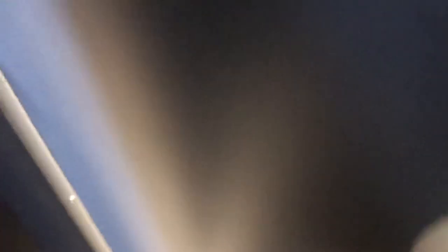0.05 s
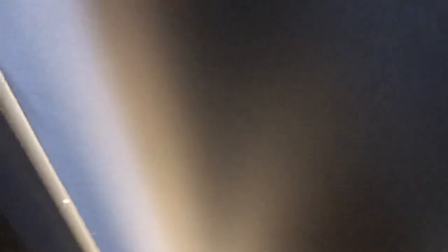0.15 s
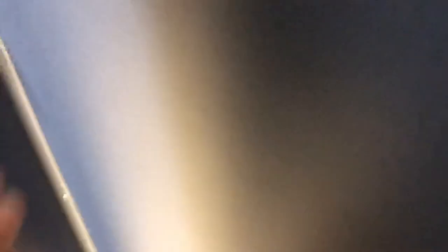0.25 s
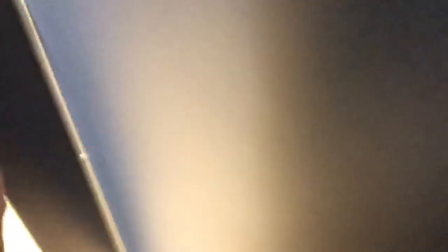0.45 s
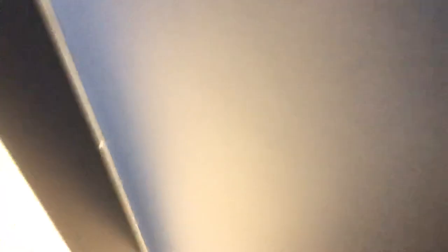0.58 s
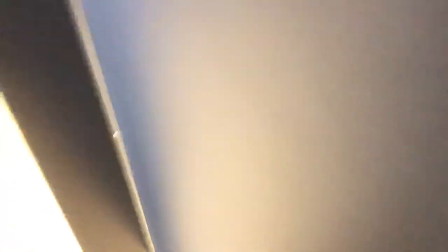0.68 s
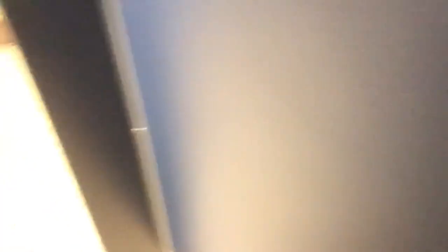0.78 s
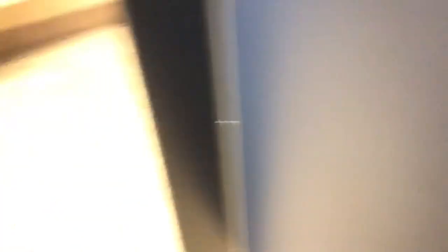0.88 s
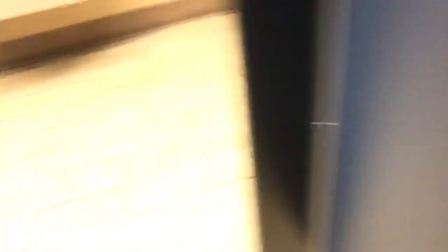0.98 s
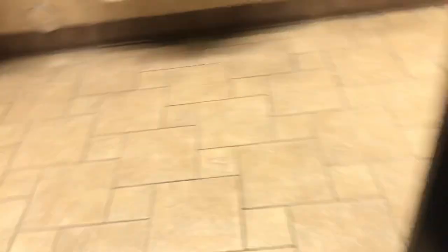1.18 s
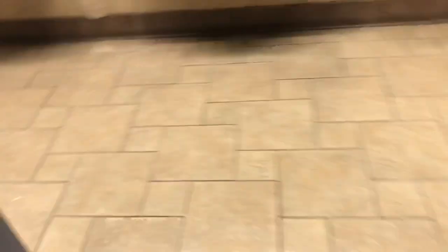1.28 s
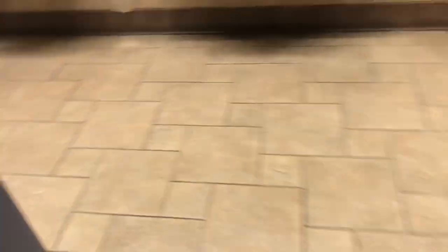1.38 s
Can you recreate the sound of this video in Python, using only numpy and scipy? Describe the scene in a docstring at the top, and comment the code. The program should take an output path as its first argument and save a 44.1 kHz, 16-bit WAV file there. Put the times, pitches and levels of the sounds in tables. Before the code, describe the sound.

Sharp metal latch clacks, then a stall door knocking loose over a faint ventilation hum.

```python
"""A small tiled toilet room, the microphone close to the steel latch of a stall.
The latch is thrown back: three bright clacks in quick succession as the bolt rattles in its keeper.
The bolt then meets its stop, the hollow door knocks loose and swings open with a soft swish.
The tiles ring after every blow, over the rumble and hum of the ventilation."""
import sys
import numpy as np
from scipy import signal
from scipy.fft import irfft
from scipy.io import wavfile

SR = 44100
rng = np.random.default_rng(int(sys.argv[2]) if len(sys.argv) > 2 else 0)


def int16_out(signal):
    """Quantize to a 16-bit WAV file."""
    q = np.round(np.clip(np.atleast_2d(signal).T, -1, 1) * 32767)
    wavfile.write(sys.argv[1], SR, q.astype(np.int16))


N = 63945


def undb(db):
    """Decibels to gain."""
    return 10 ** (np.asarray(db) / 20)


def times():
    """Time of every sample."""
    return np.arange(N) / SR


def bins():
    """Frequency of every spectral bin."""
    return np.arange(N // 2 + 1) * SR / N


def unit(x):
    """Scale to rms 1."""
    return x / np.sqrt(np.mean(x ** 2))


def fade(t60):
    """Exponential decay, 60 dB down after t60 seconds."""
    return np.exp(-np.log(1000) * times() / max(t60, 1 / SR))


def lookup(points, hz):
    """Read a table on a log-frequency axis."""
    freqs, values = np.array(points, float).T
    return np.interp(np.log(np.maximum(hz, 1)), np.log(freqs), values)


def noise(gain):
    """Noise of rms 1 with the given relative gain per bin."""
    phases = np.exp(2j * np.pi * rng.random(N // 2 + 1))
    return unit(irfft(gain * phases, N))


def coloured(points):
    """Noise of rms 1 shaped by (frequency [Hz], relative level [dB]) points."""
    return noise(undb(lookup(points, bins())))


def band(hz, octaves):
    """Noise of rms 1 in a bell-shaped band on a log-frequency axis."""
    distance = np.log2(np.maximum(bins(), 1) / hz)
    return noise(np.exp(-.5 * (distance / octaves) ** 2))


def ring(modes):
    """Freely decaying modes after one blow; neighbours swing in opposite directions."""
    t = times()
    return sum((-1) ** k * undb(db) * fade(t60) * np.sin(2 * np.pi * hz * t)
               for k, (hz, db, t60) in enumerate(modes))


def strike(sound, at, rise_s=0.00028):
    """Start a sound at the moment of contact; it swells over the rise time."""
    onset = 1 - np.exp(-times() / rise_s)
    return np.concatenate([np.zeros(max(int(at * SR), 0)), sound * onset])[:N]


def ventilation():
    """Room tone: duct rumble and a wavering motor hum."""
    # moving air (frequency [Hz], relative level [dB])
    air_spectrum = [(20, -25.5), (40, -15), (60, 2.5), (90, -3.5), (140, 0), (230, -3.5), (330, -11.5),
                    (600, -17.5), (1200, -26), (2500, -28.5), (5500, -34.5), (8000, -41.5), (16000, -47)]
    # the air is a little quieter outside the stall (time [s], level [dB])
    air_level = [(0, -45), (1.0, -45.5), (1.2, -48.5), (1.45, -47.5)]
    # motor tones (frequency [Hz], level [dB])
    motor_tones = [(59.3, -60), (119.8, -48), (239.6, -56)]
    t, waver_db = times(), 3.5
    hum = np.zeros(N)
    for hz, db in motor_tones:
        rms = undb(db + waver_db * band(1.3, octaves=0.94))
        hum += rms * np.sqrt(2) * np.sin(2 * np.pi * (hz * t + rng.random()))
    air_gain = undb(np.interp(t, *np.array(air_level).T))
    return air_gain * coloured(air_spectrum) + hum


def room(x):
    """Dense echoes off the tiles; each octave dies at its own rate."""
    # colour of the echoes (frequency [Hz], gain [dB])
    colour = [(100, -7), (300, 4.5), (800, -9), (2000, -14.5), (5000, -15), (9000, -16), (16000, -19)]
    # their decay (frequency [Hz], t60 [s])
    decay_times = [(150, 0.48), (700, 0.41), (2500, 0.62), (6000, 0.33), (10000, 0.12), (16000, 0.2)]
    first_echo_s, build_s = 0.0055, .007
    build = 1 - np.exp(-np.maximum(times() - first_echo_s, 0) / build_s)
    centres = 125 * 2. ** np.arange(8)
    response = np.zeros(N)
    for hz, pick in zip(centres, np.eye(len(centres))):
        share = lookup(list(zip(centres, pick)), bins())  # this octave's part of each bin's power
        echoes = noise(np.sqrt(share) * undb(lookup(colour, bins())))
        tail = echoes * build * fade(lookup(decay_times, hz))
        response += unit(tail) * np.sqrt(share.mean() / N) * undb(lookup(colour, hz))
    return signal.fftconvolve(x, response)[:N]


def swing():
    """Soft rubbing as the door is handled and opened, and a few tiny hinge ticks."""
    # rubs (start [s], rise [s], hold [s], fall [s], level [dB], centre [Hz], width [octaves])
    swishes = [(0.091, 0.0087, 0.0088, 0.04, -47, 433, 0.91), (0.457, 0.053, 0.027, 0.071, -50, 8900, 1),
               (0.585, 0.051, 0.26, 0.16, -62, 4630, 0.33), (.82, .2, .05, 0.056, -64, 900, 0.48),
               (1.12, 0.053, 0.052, 0.16, -68, 5370, 0.13), (1.314, 0.032, 0.016, 0.16, -56, 8300, 1)]
    # hinge ticks (time [s], level [dB])
    hinge_ticks = [(.85, -63), (.872, -52), (1.32, -50)]
    out = np.zeros(N)
    for at, rise, hold, fall, db, hz, octaves in swishes:
        swell = np.interp(times(), at + np.cumsum([0, rise, hold, fall]), [0, 1, 1, 0])
        out += undb(db) * swell * band(hz, octaves)
    for at, db in hinge_ticks:
        out += strike(undb(db) * band(12840, octaves=0.8) * fade(t60=0.021), at)
    return out


def door():
    """Knocks thud and ring the stiff edge and the hollow panel of the door."""
    # knocks (time [s], thud level [dB], edge gain [dB], panel gain [dB], thud t60 [s])
    knocks = [(.433, -25, -14, -12.5, 0.12), (0.4388, -27, 1, -5.5, 0.026),
              (.4828, -22.5, -10, -3.5, 0.053), (.4882, -28.5, -5.5, -8.5, 0.13),
              (1.428, -47.5, -63, -57, 0.068)]
    # dull thud (frequency [Hz], relative level [dB])
    thud_spectrum = [(100, -40), (220, -8.5), (500, -5), (850, -10), (1200, -6.5), (1700, -9.5),
                     (2800, -19.5), (6000, -32)]
    # stiff edge (frequency [Hz], relative level [dB], t60 [s])
    edge_modes = [(727, 0, 0.032), (828, 4, 0.026), (1215, -48, 0.066)]
    # hollow panel (frequency [Hz], relative level [dB], t60 [s])
    panel_modes = [(149, -2, .5), (205, -4, .22), (215, -3, .35), (241, 3, .25), (335, -8, .22),
                   (484, -8, .15), (517, -5, .12), (660, -6, .2), (974, -7, .18), (1050, -6, .15),
                   (1206, 6, .08), (1550, 0, .07)]
    out = np.zeros(N)
    for at, thud_db, edge_db, panel_db, t60 in knocks:
        thud = undb(thud_db) * coloured(thud_spectrum) * fade(t60)
        edge = undb(edge_db - 19.5) * ring(edge_modes)
        boom = undb(panel_db - 29) * ring(panel_modes)
        out += strike(thud + edge + boom, at)
    return out


def chatter(depth_db=1.2, rate_hz=592):
    """Uneven gain from tiny bounces of the metal parts."""
    return unit(undb(depth_db * band(rate_hz, octaves=1)))


def bolt_stop():
    """The held bolt snaps against its stop and briefly rings the housing."""
    # contacts with the stop (time [s], snap level [dB], housing gain [dB], snap t60 [s])
    stops = [(.4326, -16, -36, 0.021), (.4348, -34, 3.5, 0.031), (0.4675, -20.5, -17.5, 0.024),
             (0.4819, -18.5, -10, 0.012)]
    # snap of the bolt (frequency [Hz], relative level [dB])
    snap_spectrum = [(300, -63), (2000, 7.5), (3800, -4), (5600, 3.5), (8500, -4), (11500, -12.5),
                     (16000, -2.5)]
    # latch housing (frequency [Hz], relative level [dB], t60 [s])
    housing_modes = [(1780, -4, .035), (1911, -8, .06), (2120, -1, .06), (2918, -16, .06), (3332, -8, .035),
                     (8091, -7, .03), (9222, -12, .03), (10430, 1, .022)]
    out = np.zeros(N)
    for at, snap_db, housing_db, t60 in stops:
        snap = undb(snap_db) * coloured(snap_spectrum) * chatter() * fade(t60)
        housing = undb(housing_db - 24.5) * ring(housing_modes)
        out += strike(snap + housing, at)
    return out


def latch():
    """Close up, each clack is a burst of crowded modes and a steel ring; the door skin answers slower."""
    # bolt in its keeper (time [s], clatter gain [dB], steel gain [dB], skin gain [dB], clatter t60 [s])
    clacks = [(.2013, -6, 6, -2, 0.025), (.2058, -12.5, -15.5, 0, 0.012), (.2164, 3.5, 4, 4, 0.037),
              (0.2309, -4.5, -10.5, 3, 0.044), (0.2404, -30, -31, -2.5, 0.016)]
    # latch parts bouncing on each other (frequency [Hz], relative level [dB])
    clatter_spectrum = [(300, -23), (1500, -14.5), (3600, -10.5), (4500, -0.5), (5200, 5), (5750, -14),
                        (6400, 4.5), (7200, -7), (9900, 0), (10900, -12.5), (12400, -2.5), (16000, -15.5)]
    # steel bolt and keeper (frequency [Hz], relative level [dB], t60 [s])
    steel_modes = [(4926, -4, .05), (5024, -7, .05), (5153, -7, .04), (5290, -7, .06), (6239, -4, .08),
                   (6393, -1, .3), (8416, -9, .1), (8582, -12, .09), (9120, -15, .16), (9617, -9, .07),
                   (10243, -9, .12)]
    # door skin around the latch (frequency [Hz], relative level [dB], t60 [s])
    skin_modes = [(149, -9, .6), (517, -11, .15), (705, -5, .12), (856, -14, .2), (1339, 3, .05),
                  (1420, -3, .05), (1513, -13, .13), (1673, -4, .055), (2012, 1, .06), (2250, -4, .05),
                  (3354, -14, .11)]
    # wash of the skin's crowded modes (frequency [Hz], relative level [dB])
    wash_spectrum = [(150, -43), (400, 3), (900, 2.5), (1400, 1.5), (2200, 1.5), (2900, -4.5),
                     (5000, -42.5)]
    out = np.zeros(N)
    for at, clatter_db, steel_db, skin_db, t60 in clacks:
        clatter = undb(clatter_db - 8.5) * coloured(clatter_spectrum) * chatter() * fade(t60)
        steel = undb(steel_db - 26) * ring(steel_modes)
        wash = undb(-23.5) * coloured(wash_spectrum) * fade(t60=0.065)
        skin = undb(-26) * ring(skin_modes) + wash
        out += strike(clatter + steel, at, rise_s=0.0012)
        out += strike(undb(skin_db) * skin, at, rise_s=0.0029)
    return out


def scene():
    """One microphone in the tiled room; of all the blows, the latch's are nearest and driest."""
    near = latch()
    farther = bolt_stop() + door()
    echoes = room(undb(-1.5) * near + farther)
    return (near + farther + echoes + swing() + ventilation())[None]


def record(dry):
    """The recorder cuts the top treble steeply."""
    top_hz = 15900
    return signal.sosfilt(signal.ellip(8, .2, 70, top_hz, fs=SR, output="sos"), dry)


dry = scene()
out = record(dry)
int16_out(out)
```